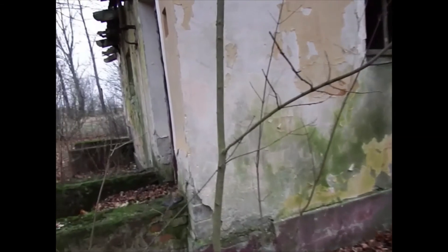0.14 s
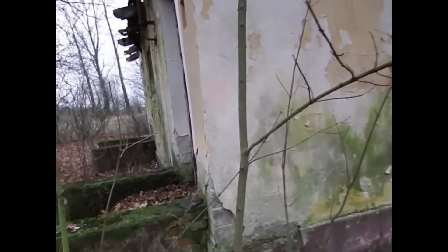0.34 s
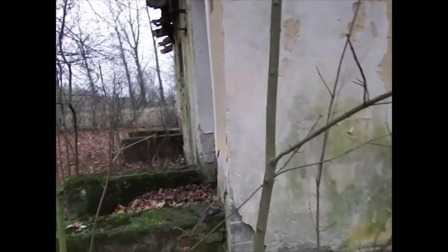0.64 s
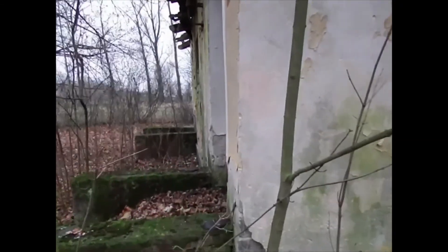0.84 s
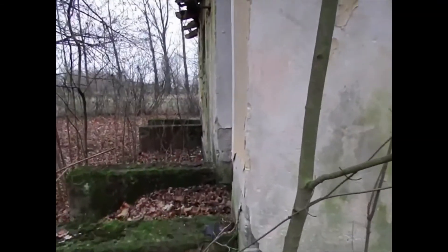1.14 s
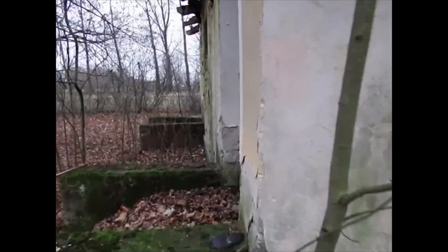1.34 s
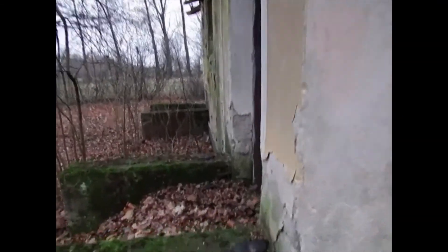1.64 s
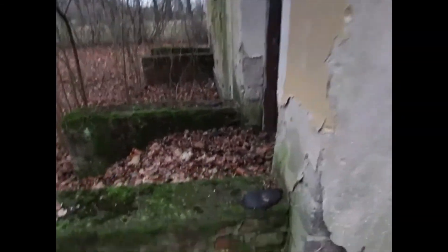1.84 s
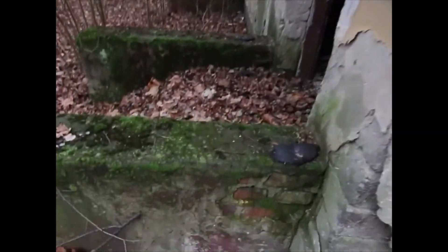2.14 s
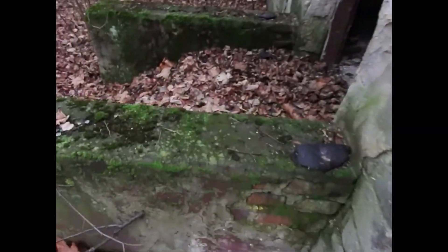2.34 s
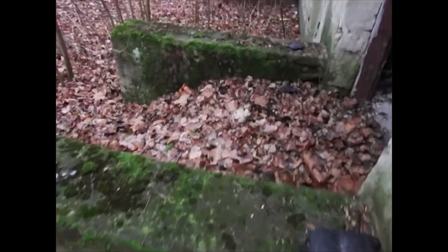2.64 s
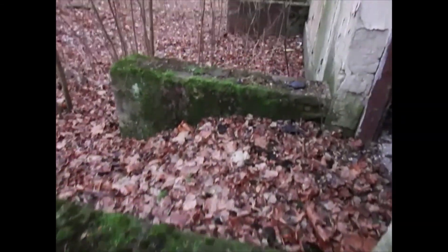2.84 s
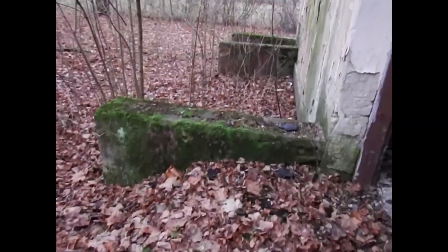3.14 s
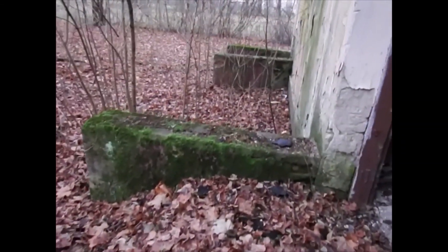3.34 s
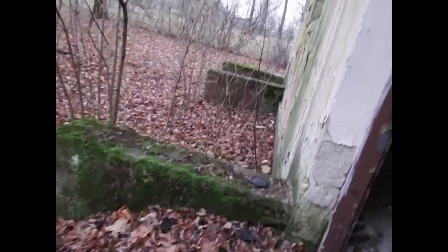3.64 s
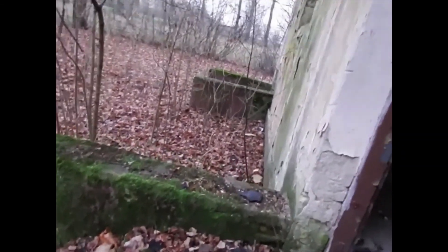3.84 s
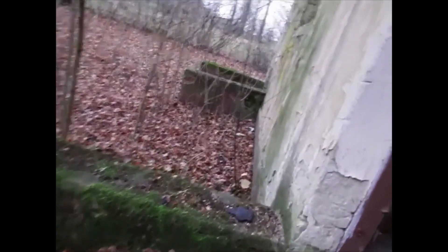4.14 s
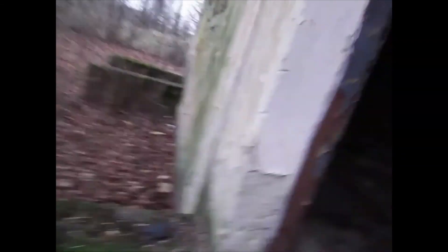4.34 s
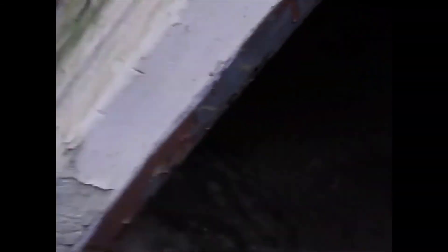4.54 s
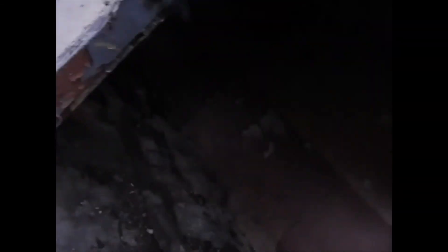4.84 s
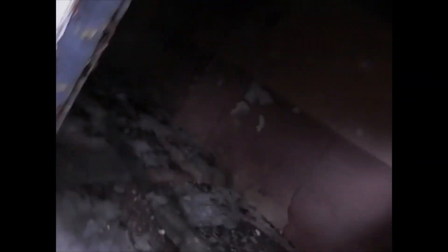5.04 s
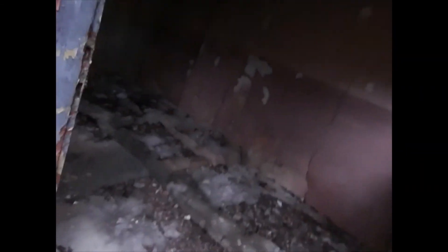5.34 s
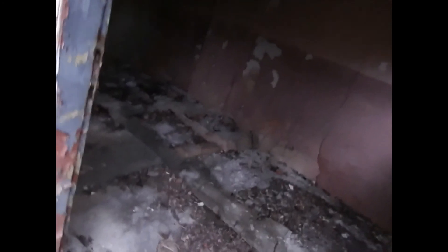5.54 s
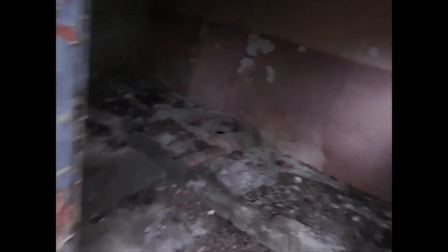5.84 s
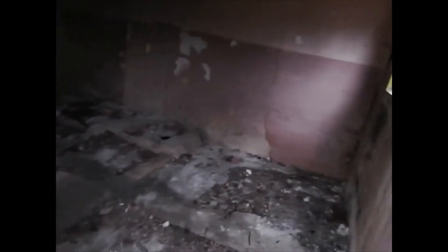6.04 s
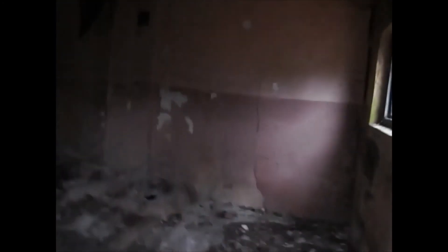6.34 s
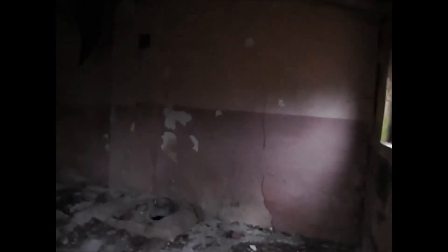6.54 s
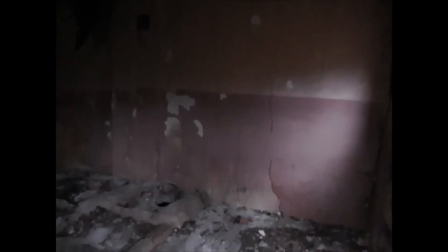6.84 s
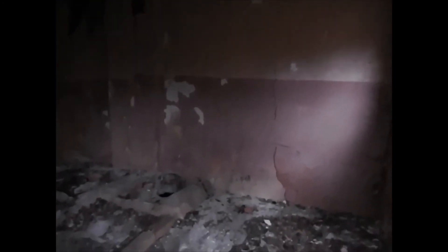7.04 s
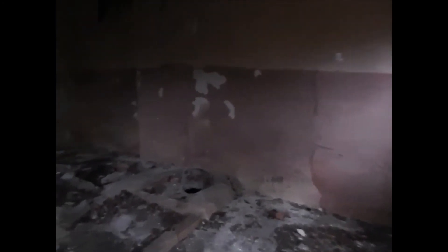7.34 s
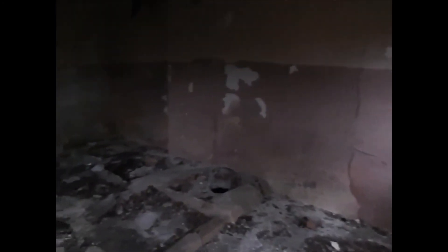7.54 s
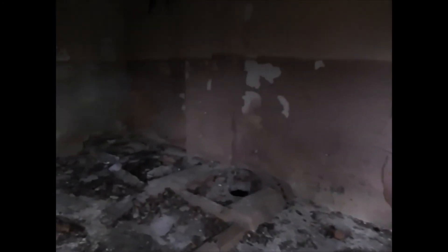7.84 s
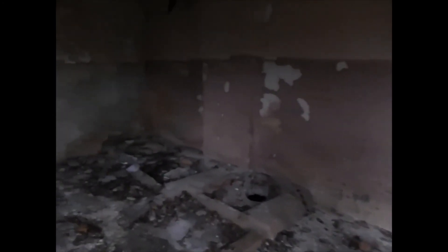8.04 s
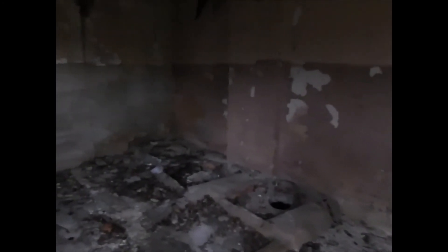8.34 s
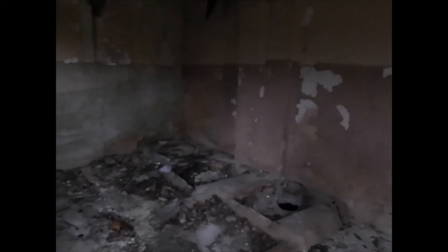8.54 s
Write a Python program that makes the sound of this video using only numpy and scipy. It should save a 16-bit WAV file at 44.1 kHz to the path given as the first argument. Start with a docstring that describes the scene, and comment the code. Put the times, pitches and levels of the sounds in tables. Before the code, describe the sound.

Close to a hand-held microphone, shoes push through dry leaves outside a derelict house, with rustling swells, small twig snaps and dull sole knocks. The steps get busier toward the doorway, where a stick breaks with a very loud crack. After a short hush, gritty scuffs continue in a bare, lightly ringing room, and a brittle shard cracks in quick stages. Faint hiss and a soft sleeve swish remain.

```python
"""Dry leaves rustle and crunch close to a hand-held microphone, on the walk to a derelict house.
Fracture impulses and noise, coloured and gated by each step, make the litter; decaying modes make
twigs, shoe knocks and the stick that cracks loudly at the doorway. After a short hush the steps go
on inside, where a brittle shard cracks underfoot and sparse reflections ring in the bare room.
Behind them lie faint hiss, soft thuds, metallic tinks and hollow swishes, likely of a sleeve."""
import sys
import numpy as np
from scipy import signal
from scipy.fft import rfft, irfft
from scipy.io import wavfile

SR = 44100
rng = np.random.default_rng(int(sys.argv[2]) if len(sys.argv) > 2 else 0)


def master_out(mix):
    """Clip the mix to full scale and print it as 16-bit PCM to the path in sys.argv[1]."""
    frames = np.transpose(np.atleast_2d(mix))
    ceiling = np.clip(frames, -1, 1)
    pcm = np.round(ceiling * 32767).astype(np.int16)
    wavfile.write(sys.argv[1], SR, pcm)


N = 382788  # samples
HIT_S = 0.006  # stretch over which a blow's level is taken


def amp(db):
    """Decibels to gain."""
    return 10 ** (np.asarray(db) / 20)


def evened(x):
    """Scales to rms 1."""
    return x / np.sqrt(np.mean(x ** 2) + 1e-20)


def hit(x):
    """Scales a blow to rms 1 over its first milliseconds."""
    return x / np.sqrt(np.mean(x[:round(HIT_S * SR)] ** 2) + 1e-20)


def read(points, hz):
    """Reads a frequency table at any frequency, on a log axis."""
    f, value = np.transpose(points)
    return np.interp(np.log(hz + 1), np.log(f + 1), value)


def follow(rows):
    """Reads a time curve at every sample."""
    return np.interp(np.arange(N) / SR, *np.transpose(rows))


def add(mix, s, sound):
    """Lays a sound into the mix at s seconds."""
    part = mix[round(s * SR):][:len(sound)]
    part += sound[:len(part)]


def panned(x, left_db):
    """Places a sound by making the left port louder or softer than the right."""
    return np.array([x * amp(left_db / 2), x / amp(left_db / 2)])


def colour(x, points, size=2048):
    """Causal filter with the given spectrum, so that clicks keep their sharp front."""
    log_gain = np.log(amp(read(points, abs(np.fft.fftfreq(size, 1 / SR)))))
    minimum_phase = np.exp(np.conj(signal.hilbert(log_gain)))
    taps = np.fft.ifft(minimum_phase).real
    return signal.oaconvolve(x, taps[:size // 2])[:len(x)]


def resonate(x, hz, q):
    """One broad resonance."""
    return signal.lfilter(*signal.iirpeak(hz, max(q, 0.7), SR), x)


def thinned(x, edge_hz):
    """High-pass: small light things radiate little bass."""
    return signal.sosfilt(signal.butter(2, edge_hz, "high", fs=SR, output="sos"), x)


def ring(t, hz, t60):
    """One mode, dying by 60 dB in t60 seconds."""
    return np.sin(2 * np.pi * hz * t) * amp(-60 * t / t60)


def swell(t, middle, half):
    """A smooth, bell-shaped rise and fall."""
    return np.exp(-0.5 * ((t - middle) / half) ** 2)


def swells(rows):
    """Gain curve of several swells."""
    t = np.arange(N) / SR
    return sum(amp(db) * swell(t, middle, half) for middle, db, half in rows)


def wander(rate_hz):
    """Slow chance of rms 1, from 5 Hz up to about the given rate."""
    hz = np.fft.rfftfreq(N, 1 / SR)
    band = (hz > 5) / (1 + (hz / rate_hz) ** 4)
    return evened(irfft(rfft(rng.standard_normal(N)) * band, N))


def crackle(per_s, spread_db, clump_db, clump_hz):
    """Tiny fractures at random: many small, a few large, swelling in clumps."""
    size_db = spread_db * np.minimum(rng.exponential(1, N), 5)
    sizes = amp(size_db) * rng.choice([-1, 1], N)
    struck = rng.random(N) < per_s / SR
    return evened(sizes * struck * amp(clump_db * wander(clump_hz)))


def flakes(low_hz, high_hz, q, per_s, spread_db, clump_db, clump_hz, count):
    """Pieces of several sizes, each with its own pitch and bursts: the colour keeps shifting."""
    total = np.zeros(N)
    for hz in np.geomspace(low_hz, high_hz, count):
        pieces = crackle(per_s, spread_db, clump_db, clump_hz)
        total += evened(resonate(pieces, hz, q)) * np.sqrt(hz)
    return evened(total)


# faint steady hiss, dipping briefly after the stick cracks: (time [s], level [dB])
HISS = [(0, -63.5), (5.5, -64.5), (5.62, -77), (6.12, -77), (6.25, -64)]
# colour of the hiss: (frequency [Hz], relative level [dB per Hz])
AIR = [(25, -25), (100, -16.5), (300, 6), (700, -5), (3200, -3), (4500, -7), (5600, -12), (8200, -12.5),
       (10000, -14), (16000, -19)]


def air_hiss():
    """Coloured noise that follows the hiss level."""
    return amp(follow(HISS)) * evened(colour(rng.standard_normal(N), AIR))


# the bare room's ring: (frequency [Hz], t60 [s])
ROOM = [(100, 0.13), (1500, 0.5), (4000, 0.35), (8000, 0.17), (16000, 0.23)]


def echoes(x, t60_of_hz):
    """Sparse reflections of random sign, each band dying at its own speed."""
    taps = rng.choice([-1., 1.], SR) * (rng.random(SR) < 3000 / SR)
    hz, t, bands = signal.stft(taps, SR, nperseg=256)
    decay = amp(-60 * t / read(t60_of_hz, hz)[:, None])
    tail = signal.istft(bands * decay, SR, nperseg=256)[1]
    return signal.fftconvolve(x, tail / np.linalg.norm(tail))[:N]


# soft low thuds under the steps: (middle [s], level [dB], half length [s])
RUMBLES = [(0.72, -69, 0.02), (1.438, -61.5, 0.045)]


def rumbles(thud_hz=125):
    """Short swells of low, twice resonated noise."""
    low = resonate(resonate(rng.standard_normal(N), thud_hz, 0.92), thud_hz, 0.74)
    return swells(RUMBLES) * evened(low)


# faint hollow swishes, likely a sleeve rubbing: (middle [s], level [dB], half length [s])
SWISHES = [(6.51, -55, 0.17), (8.68, -56, 0.19)]
# colour of the sleeve: (frequency [Hz], relative level [dB per Hz])
CLOTH = [(200, -28), (1500, -10), (2280, 7.5), (2700, -9), (3120, 6), (3500, -11), (4400, -5), (5400, -36),
         (8000, -18.5), (12000, -44)]


def sleeve():
    """Smooth friction noise coloured by a few broad resonances."""
    return swells(SWISHES) * evened(colour(rng.standard_normal(N), CLOTH))


# a small piece of metal near the microphone tinkles when jolted: (time [s], level [dB])
TINKS = [(4.047, -53), (4.416, -52), (6.051, -59.5)]


def tinks(hz=5400, t60=0.057):
    """One thin metallic mode, struck a few times."""
    out, t = np.zeros(N), np.arange(4096) / SR
    for s, db in TINKS:
        add(out, s, amp(db) * hit(ring(t, hz, t60)))
    return out


# a shard cracks in stages under the sole indoors, levels before level_db:
# (time [s], level over the first 6 ms [dB], gain of the lowest mode [dB])
SHARD_CRACKS = [(7.7147, -19, -10.5), (7.7372, -24, -16), (7.741, -25, -13), (7.7543, -15.5, -2),
                (7.7617, -25.5, 5), (7.779, -20.5, -4)]
# modes of the shard, lowest first: (frequency [Hz], relative level [dB], t60 [s])
SHARD = [(1434, -1, 0.012), (3040, -18, 0.018), (3660, 1.5, 0.0068), (4080, 5, 0.0072), (6500, -25, 0.0086)]
# colour of splinters and chips, shared by all breaking: (frequency [Hz], relative level [dB per Hz])
SPLINTER = [(30, -43.5), (200, -26), (450, -10), (1000, 3.5), (1500, 8), (2200, 6), (3300, 9.5), (4450, 0),
            (5200, -6), (7000, -23), (9500, -31), (16000, -58)]
# bright edge of a fracture, shared likewise: (frequency [Hz], relative level [dB per Hz])
SHARP = [(1500, -40), (4300, 4.5), (5500, -3.5), (7000, -4), (8500, -9.5), (9800, -22.5), (12000, -20.5),
         (16000, -32.5)]


def shard(level_db=-1, chips_db=-10, chips_t60=0.021, edge_db=-20, rise_s=0.00072):
    """Each crack rings the shard's modes and throws off a few chips."""
    out, t = np.zeros(N), np.arange(2048) / SR
    lowest, *upper = [amp(db) * ring(t, hz, t60) for hz, db, t60 in SHARD]
    noises = rng.standard_normal((len(SHARD_CRACKS), len(t)))
    for (s, db, low_db), noise in zip(SHARD_CRACKS, noises):
        body = hit((1 - np.exp(-t / rise_s)) * (amp(low_db) * lowest + sum(upper)))
        debris = noise * amp(-60 * t / chips_t60)
        chips = amp(chips_db) * hit(colour(debris, SPLINTER))
        edge = amp(edge_db) * hit(colour(debris, SHARP))
        add(out, s, amp(db + level_db) * (body + chips + edge))
    return out


# the stick at the doorway breaks in quick stages: (time [s], level [dB])
BREAKS = [(5.5042, -3), (5.5065, -11), (5.5082, -16.5)]
# modes of the stick: (frequency [Hz], relative level [dB], t60 [s])
STICK = [(733, -13.5, 0.032), (1494, -0.5, 0.025), (1740, -7, 0.0071), (2233, -13.5, 0.02),
         (3000, -21.5, 0.022), (3640, -15, 0.03)]


def stick(level_db=0, tear_db=-25, tear_t60=0.072, soft_hz=7000, edge_db=-45):
    """Each stage of the break clicks sharply and rings the wood's modes while fibres tear."""
    out, t = np.zeros(N), np.arange(3072) / SR
    wood = sum(amp(db) * ring(t, hz, t60) for hz, db, t60 in STICK)
    wood = signal.lfilter(*signal.butter(2, soft_hz, fs=SR), wood)
    click = hit(thinned(colour(1. * (t == 0), SHARP), 9000))
    for s, db in BREAKS:
        tearing = rng.standard_normal(len(t)) * amp(-60 * t / tear_t60)
        fibres = hit(colour(tearing, SPLINTER))
        add(out, s, amp(db + level_db) * (wood + amp(tear_db) * fibres + amp(edge_db) * click))
    return thinned(out, 240)


# shoes knocking on ground, wood and rubble, levels before level_db:
# (time [s], level over the first 6 ms [dB], ring [Hz], ring t60 [s], overtone slope [dB per octave])
KNOCKS = [(0.329, -38, 420, 0.04, -12), (1.6975, -27.5, 810, 0.019, -3), (1.6994, -27.5, 417, 0.027, 5.5),
          (1.8323, -25, 766, 0.039, 1.5), (2.642, -39, 720, 0.031, -14), (2.772, -38, 760, 0.03, -14),
          (2.7827, -27.5, 710, 0.035, -19), (2.824, -32.5, 880, 0.019, -16), (2.8479, -34, 525, 0.039, -12),
          (2.882, -37, 460, 0.039, -12), (2.9414, -35.5, 487, 0.035, -19), (3.731, -30.5, 875, 0.019, -12),
          (3.74, -26.5, 935, 0.02, -5.5), (3.752, -34, 386, 0.075, -4), (4.5307, -33.5, 664, 0.019, -7),
          (4.8, -35, 384, 0.077, -19), (4.9702, -17.5, 777, 0.016, -6), (4.9819, -21, 780, 0.01, -19),
          (4.9866, -24, 873, 0.024, -13), (5.0472, -32, 896, 0.067, -2), (5.303, -32, 577, 0.052, -1),
          (5.367, -37, 460, 0.063, -9), (5.536, -22.5, 784, 0.022, -5), (5.6444, -28, 754, 0.013, -4),
          (5.8, -50, 781, 0.059, -10), (6.785, -38, 715, 0.015, -16)]
# overtones of a knock: (multiple of its ring [ratio], relative level [dB], share of its t60 [ratio])
OVERTONES = [(0.622, -15.5, 0.96), (1.931, -5, 0.79), (2.78, 2.5, 0.49), (3.12, -2.5, .5), (4.25, -3, .35),
             (4.8, -15, 0.6)]
# dull colour of sole and settling litter: (frequency [Hz], relative level [dB per Hz])
SOLE = [(25, -43), (70, -15.5), (130, -24), (220, -11), (320, 0), (520, 1), (800, 2.5), (1050, 0),
        (1500, -2.5), (3000, -37), (16000, -62)]


def knocks(level_db=-1.5, scatter_db=-7, scatter_stretch=2.46, thump_db=-24):
    """A quickly damped knock, each with its own share of overtones, with litter settling under it."""
    out, t = np.zeros(N), np.arange(3072) / SR
    push = 1 - np.exp(-t / 0.00045)  # soft onset
    noises = rng.standard_normal((len(KNOCKS), len(t)))
    for (s, db, hz, t60, slope_db), noise in zip(KNOCKS, noises):
        modes = ring(t, hz, t60)
        for k, mode_db, share in OVERTONES:
            tilt_db = slope_db * max(np.log2(k), 0)
            modes = modes + amp(mode_db + tilt_db) * ring(t, k * hz, share * t60)
        fall = amp(-60 * t / (scatter_stretch * t60))
        settling = hit(colour(noise * fall, SOLE))
        add(out, s, amp(db + level_db) * hit(hit(push * modes) + amp(scatter_db) * settling))
    return thinned(out, 140) + amp(thump_db) * out  # a little bass is left in


# twigs, stalks and grit, before level_db and edge_db: (time [s], level over the first 6 ms [dB],
# ring [Hz], sharp edge over the snap [dB], splinters over the fracture [dB])
SNAPS = [(0.1107, -42, 2030, -13, -2), (0.3092, -28.5, 1890, -18.5, -4), (1.0986, -38.5, 2690, -30, -21),
         (1.133, -36.5, 2940, -30, -18), (1.296, -31, 2020, -6.5, -32), (2.1988, -28.5, 2100, -19, -11),
         (2.3309, -27, 2700, -24, -13), (2.595, -38, 2300, -27, -15), (2.7996, -32.5, 2270, -12, -3),
         (3.142, -37, 2760, -33, -16), (3.6132, -26.5, 2530, -33, -1), (3.831, -39, 1920, -10, -28),
         (3.243, -44, 2250, -26, -18), (3.86, -35, 2390, -24, -7), (3.882, -30, 3245, -28, -18),
         (3.894, -23, 2720, -37, -17), (3.921, -35, 2940, -22, -12), (3.963, -32, 2770, -35, -10),
         (3.9826, -26, 3050, -25, -16), (4.0457, -20, 3120, -8.5, -27), (4.364, -23, 3360, -18.5, -18),
         (4.372, -27, 3580, -18, -29), (4.4142, -18, 3620, -10.5, -28.5), (4.797, -31, 2360, -37, -13),
         (4.836, -31.5, 1670, -20, -25.5), (4.905, -31.5, 3400, -13, -6), (4.9502, -33, 2980, -24, -19),
         (4.9864, -24.5, 2010, -6.5, -14), (5.019, -29.5, 2800, -21, -12.5),
         (5.1069, -30.5, 3170, -11.5, -11.5), (5.1434, -26, 1540, -17, -12.5),
         (5.2382, -30, 2000, -8.5, -12), (5.392, -37.5, 2900, -4, -13), (5.6388, -29, 3770, -15, -23.5),
         (5.646, -31, 3880, -6.5, -5), (5.8, -40, 1740, -19, -25), (5.813, -49, 1970, -12, -11.5),
         (6.0475, -47.5, 3230, -1.5, -11), (7.3172, -26, 2520, -34, -2)]
# the nearest, loudest snaps lie further left: (snap level [dB], left over right [dB])
SNAP_PAN = [(-23, -1), (-21, 3)]
# modes of a twig: multiples of a snap's ring [ratio]
TWIG_MODES = [0.77, 1, 1.223]


def snaps(level_db=-2.5, edge_db=-1, ring_db=6, splinter_t60=0.031):
    """One sharp fracture rings the twig's modes briefly; splinters trail off. Left and right."""
    out, t = np.zeros((2, N)), np.arange(2048) / SR
    noises = rng.standard_normal((len(SNAPS), len(t)))
    for (s, db, hz, sharp_db, splinter_db), noise in zip(SNAPS, noises):
        fracture = (t == 0) + amp(splinter_db) * noise * amp(-60 * t / splinter_t60)
        wood = hit(colour(fracture, SPLINTER))
        modes = sum(resonate(wood, hz * k * rng.uniform(0.97, 1.03), q=13) for k in TWIG_MODES)
        body = hit(wood + amp(ring_db) * hit(modes))
        edge = amp(sharp_db + edge_db) * hit(colour(fracture, SHARP))
        sound = amp(db + level_db) * (body + edge)
        left_db = np.interp(db, *np.transpose(SNAP_PAN))
        for channel, part in zip(out, panned(sound, left_db)):
            add(channel, s, part)
    return out


# clumps crushed at once, before high_db, low_db and the uneven stretch of the burst:
# (middle [s], level [dB], half length [s], low part over high part [dB], resonance [Hz])
CRUNCHES = [(0.927, -34.5, 0.0033, -31, 3200), (1.111, -40, 0.02, -24, 2620),
            (2.33, -33.5, 0.0087, -15, 2800), (2.842, -34.5, 0.0061, -8.5, 3140),
            (3.055, -34.5, 0.0061, -6.5, 2260), (3.667, -35.5, 0.0086, -30, 2950),
            (3.739, -34.5, 0.006, -2.5, 1190), (4.253, -29.5, 0.005, -36, 3200),
            (4.379, -28, 0.0029, -18, 3520), (4.413, -25, 0.0019, -11, 3660), (5.047, -27, 0.003, -5, 1260),
            (5.134, -31.5, 0.0078, -15, 1590), (5.189, -32, 0.0027, -9.5, 2510),
            (5.641, -36, 0.0095, -5, 3370), (6.045, -49.5, 0.012, -6.5, 1970),
            (7.74, -35, 0.024, -28, 3970), (7.777, -25, 0.01, -33, 3000)]


def crunches(high_db=-1, low_db=4.5, q=7.2, ring_db=5.0):
    """A clump gives way: a swarm of coarse fractures sets in quickly and dies more slowly."""
    out, t = np.zeros(N), np.arange(8192) / SR
    grains = crackle(per_s=2400, spread_db=3, clump_db=2, clump_hz=300)
    grains = evened(colour(grains, SPLINTER))
    thuds = evened(thinned(colour(rng.standard_normal(N), SOLE), 100))
    middle = t.mean()
    for s, db, half, weight_db, hz in CRUNCHES:
        start = s - middle
        span = slice(round(start * SR), round(start * SR) + len(t))
        width = half * np.where(t < middle, 0.6, 1.25)
        burst = swell(t, middle, width)
        ringing = evened(resonate(grains[span], hz, q))
        high = evened(burst * (grains[span] + amp(ring_db) * ringing))
        low = evened(burst * thuds[span])
        sound = amp(high_db) * high + amp(low_db + weight_db) * low
        add(out, start, amp(db) * np.sqrt(np.mean(burst ** 2)) * sound)
    return out


# a foot pushes through the litter, levels before the trims in rustle():
# (start [s], swell [s], fade [s], rustle [dB], low scuff of the sole over the rustle [dB])
STROKES = [(0.0, 0.001, 0.08, -48, -0.5), (0.25, 0.1, 0.29, -35, -5.5), (0.79, 0.066, 0.29, -43.5, -3),
           (1.084, 0.084, 0.51, -42, -6.5), (1.2, 0.17, 0.35, -39.5, -5), (1.6, 0.062, 0.055, -40.5, -7.5),
           (1.88, 0.16, 0.37, -31.5, -5.5), (2.27, 0.042, 0.56, -40.5, -7), (2.73, 0.11, 0.52, -40.5, -3),
           (2.96, 0.074, 0.5, -44.5, -0.5), (3.39, 0.19, 0.67, -42, -3), (3.76, 0.09, 0.16, -39, -4),
           (4.07, 0.038, 0.095, -42, -1.5), (4.16, 0.053, 0.35, -40.5, -8), (4.33, 0.058, 0.036, -37.5, -2),
           (4.46, 0.024, 0.097, -42, 1.5), (4.52, 0.043, 0.38, -44, -4.5), (4.765, 0.035, 0.22, -38.5, 0.5),
           (4.88, 0.075, 0.41, -39, -1), (5.09, 0.044, 0.42, -37, -6), (5.32, 0.046, 0.49, -45.5, -5.5),
           (6.185, 0.031, 0.081, -38, -7), (6.2, 0.11, 0.97, -51, -5.5), (6.765, 0.032, 0.21, -44, -7.5),
           (7.07, 0.085, 0.25, -33.5, -7.5), (7.295, 0.029, 0.13, -31, -16), (7.41, 0.062, 0.19, -35, -7),
           (7.67, 0.089, 0.2, -29, -13), (7.85, 0.12, 0.16, -39, -7.5)]
# the litter never quite settles: rustle [dB], scuff over the rustle [dB], fizz over the rustle [dB]
STIR = (-59, -1, -25.5)


def effort(depth_db=16.5, curve=0.97, fizz_db=-20.5):
    """Gains of rustle, scuff and fizz: strokes swell and fade over a faint stir, and dip with the hiss."""
    t = np.arange(0, N, 64) / SR
    stir_db, stir_low_db, stir_fine_db = STIR
    power = np.outer(amp([0, stir_low_db, stir_fine_db]), amp(stir_db) * np.ones(len(t))) ** 2
    for start, rise, fade, db, low_db in STROKES:
        past_top = t - start - rise
        # climbs by depth_db in the swell time and sinks as far in the fade time
        shape_db = -depth_db * np.maximum(-past_top / rise, past_top / fade) ** curve
        stroke = amp(db + shape_db) * (t >= start)
        power += np.outer(amp([0, low_db, fizz_db]), stroke) ** 2
    hush = amp(follow(HISS) - HISS[0][1])
    return [hush * np.interp(np.arange(N) / SR, t, gain) for gain in np.sqrt(power)]


# single dry leaves brush past the shoe: (middle [s], level [dB], half length [s])
BRUSHES = [(0.456, -44, 0.019), (0.848, -48.5, 0.024), (1.647, -40.5, 0.0096), (0.966, -45.5, 0.0061),
           (1.177, -43, 0.0088), (1.218, -42.5, 0.013), (2.174, -36.5, 0.018), (2.293, -43, 0.0069),
           (2.952, -49.5, 0.011), (3.191, -46.5, 0.0059), (4.596, -47, 0.021), (4.921, -36.5, 0.019),
           (5.27, -43.5, 0.019), (6.821, -42, 0.028)]
# colour of leaves: (frequency [Hz], relative level [dB per Hz])
LEAF = [(300, -33.5), (800, 3.5), (1300, 1.5), (1900, -1), (2300, 0.5), (3200, 0), (4100, -3), (4700, -9.5),
        (5500, -26), (9000, -59), (16000, -65)]
# colour of the finest, driest edges: (frequency [Hz], relative level [dB per Hz])
FIZZ = [(2000, -48), (4500, 11), (7000, -1.5), (8200, 1.5), (10000, -5), (13000, -20), (16000, -30)]


def rustle(leaves_db=1.0, sole_db=-1.06, fizz_db=-0.4, brush_hz=3200, brush_q=1.8, brush_fizz_db=-14.5):
    """Leaves crackle one by one under a light foot and merge under a heavy one; sole scuffs, edges fizz."""
    push, scuff, fine = effort()
    fractures = crackle(per_s=7000, spread_db=1.5, clump_db=2.2, clump_hz=70)
    blades = flakes(1400, 4200, q=9, per_s=900, spread_db=2, clump_db=3, clump_hz=40, count=11)
    stalks = crackle(per_s=110, spread_db=1.5, clump_db=1.5, clump_hz=20)
    stalks = stalks / np.hypot(1, push / amp(-42))  # single cracks stand out less under a heavy foot
    debris = flakes(175, 830, q=3, per_s=600, spread_db=1.8, clump_db=2.6, clump_hz=30, count=5)
    leaves = evened(colour(blades + 0.65 * fractures + 0.85 * stalks, LEAF))
    sole = evened(colour(debris + 0.77 * fractures, SOLE))
    fizz = evened(colour(rng.standard_normal(N) + fractures, FIZZ))
    brush = swells(BRUSHES)
    # a single leaf sounds higher
    blade = evened(resonate(colour(fractures + stalks, LEAF), brush_hz, brush_q))
    fine = np.hypot(fine, amp(brush_fizz_db) * brush)
    strokes = amp(leaves_db) * push * leaves + amp(sole_db) * scuff * sole
    return strokes + amp(fizz_db) * fine * fizz + brush * blade


# phase between the microphone ports: (frequency [Hz], lead of the left [rad])
LEAD = [(250, 0.38), (500, -0.12), (1300, -0.11), (2300, 0.036), (4700, 0.85), (6000, 0.32), (7500, -0.017),
        (10000, -0.24)]
# sound that reaches the two ports unlike: (frequency [Hz], gain [dB])
UNLIKE = [(50, -15.5), (300, -16.5), (1500, -14.5), (4000, -17), (6000, 0), (14000, -8)]


def ports(pair, spread):
    """Two close ports: sound from all around reaches them unlike, and the case shifts their phase."""
    side = colour(spread, UNLIKE)
    turn = np.exp(0.5j * read(LEAD, np.fft.rfftfreq(N, 1 / SR)))
    return irfft(rfft(pair + np.array([side, -side])) * np.array([turn, 1 / turn]), N)


# send to the room's reflections, growing past the doorway: (time [s], gain [dB])
INDOORS = [(4.5, -44), (5.5, -46.5), (6.06, -7.5), (6.22, -14.5), (6.8, -9), (7.7, -9.5)]


def scene(shard_room_db=4, wide_db=-5):
    """The steps close by, the room they enter and a faint hiss, at the two ports."""
    litter = rustle() + crunches() + knocks() + rumbles() + sleeve()
    twigs, crack, brittle = snaps(), stick(), shard()
    clicks = twigs.mean(0)
    wet = amp(follow(INDOORS))
    direct = 1 / np.sqrt(1 + 0.5 * wet ** 2)  # indoors the reflections carry part of the loudness
    sent = (litter + clicks + 0.22 * crack + amp(shard_room_db) * brittle) * direct * wet
    hiss, other_hiss = air_hiss(), air_hiss()
    near = panned(litter + brittle, left_db=-2) + twigs + tinks() + panned(crack, left_db=0.9)
    around = panned(echoes(sent, ROOM) + hiss, left_db=-1.8)
    # off the walker's body, a little later
    bounce = np.pad(litter + clicks + crack + brittle, (round(0.001194 * SR), 0))[:N]
    scattered = echoes(bounce, [(1000, 0.034)]) * direct
    aside = amp(wide_db) * rustle() * direct  # leaves stirred to either side
    return ports(near * direct + around, scattered + aside + echoes(sent, ROOM) + other_hiss)


# notches in the microphone's response: (frequency [Hz], width [Hz])
NOTCHES = [(226, 31), (1105, 103)]


def record(dry, edge_hz=15830):
    """The microphone's two notches and thin bass, full-scale clipping, then the band limit."""
    for hz, width in NOTCHES:
        dry = signal.lfilter(*signal.iirnotch(hz, hz / width, SR), dry)
    dry = signal.lfilter(*signal.butter(1, 70, "high", fs=SR), dry)
    edge = signal.firwin(511, edge_hz, window=("kaiser", 9), fs=SR)
    return signal.oaconvolve(np.clip(dry, -1, 1), edge[None], "same")


dry = scene()
out = record(dry)
master_out(out)
```